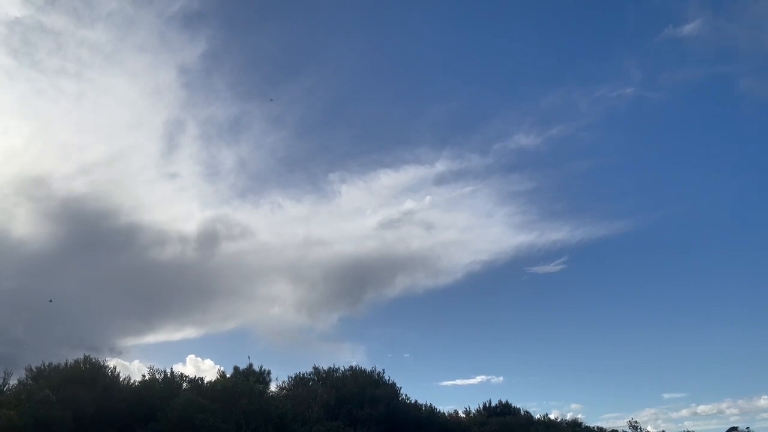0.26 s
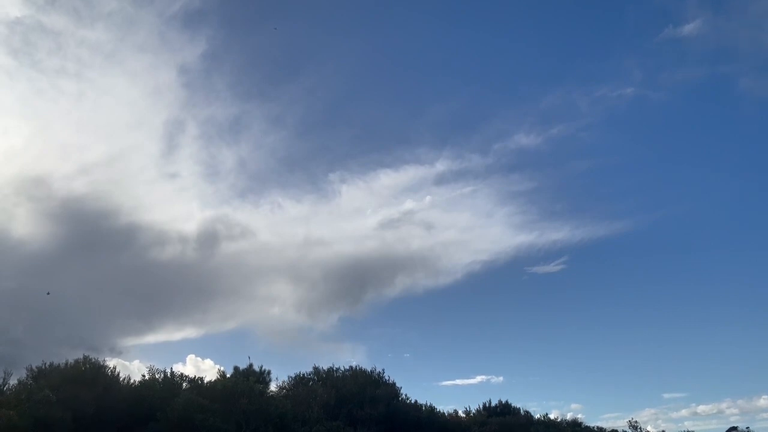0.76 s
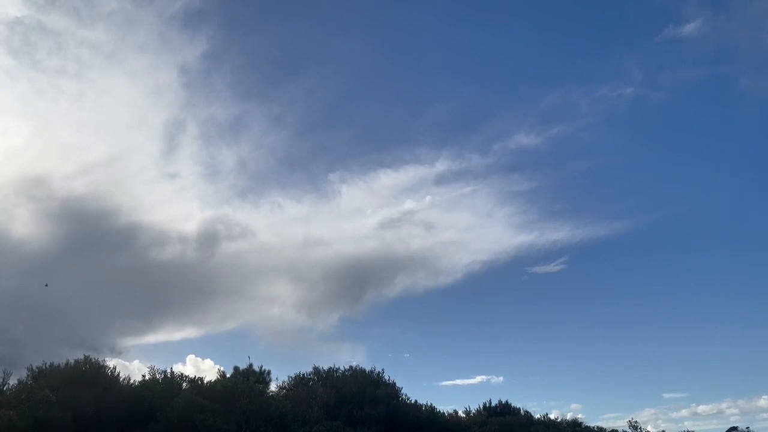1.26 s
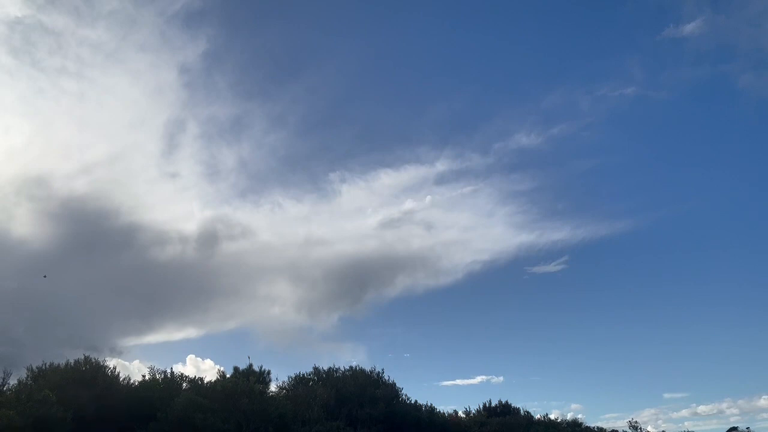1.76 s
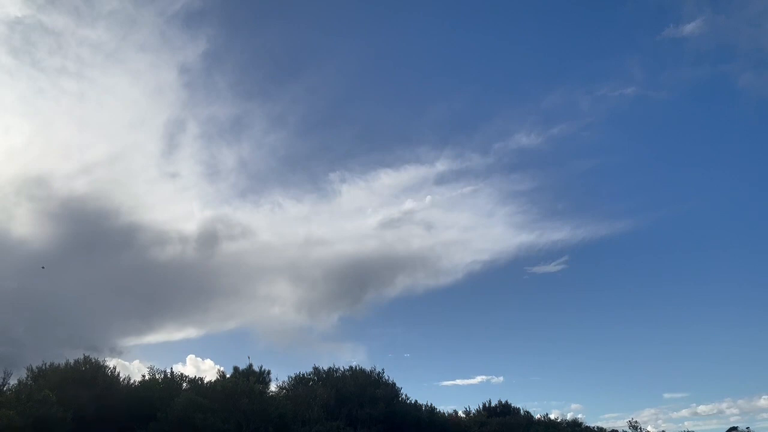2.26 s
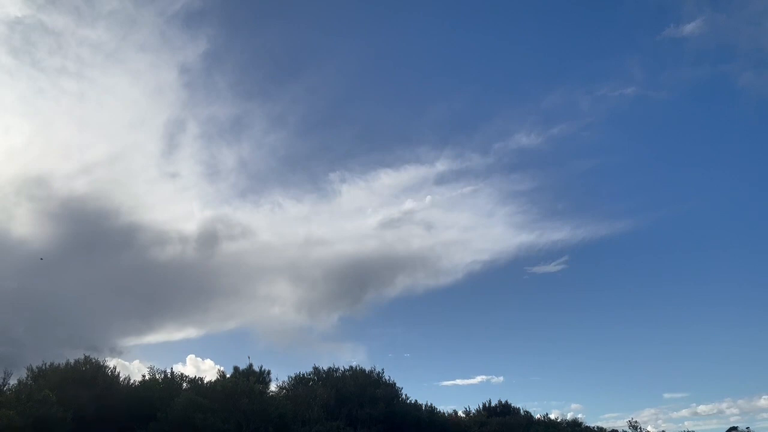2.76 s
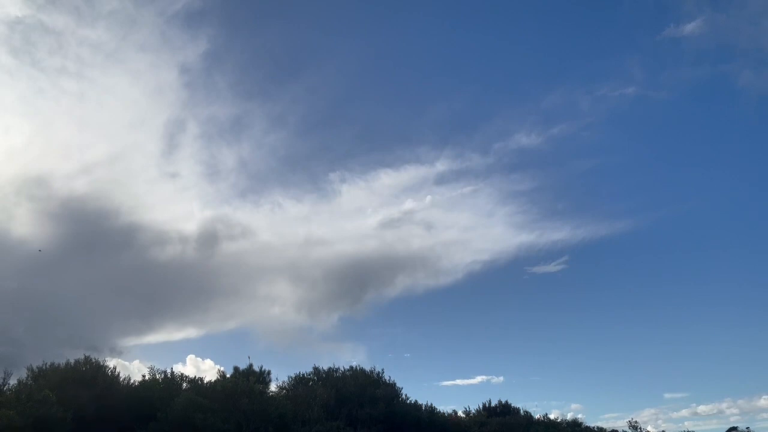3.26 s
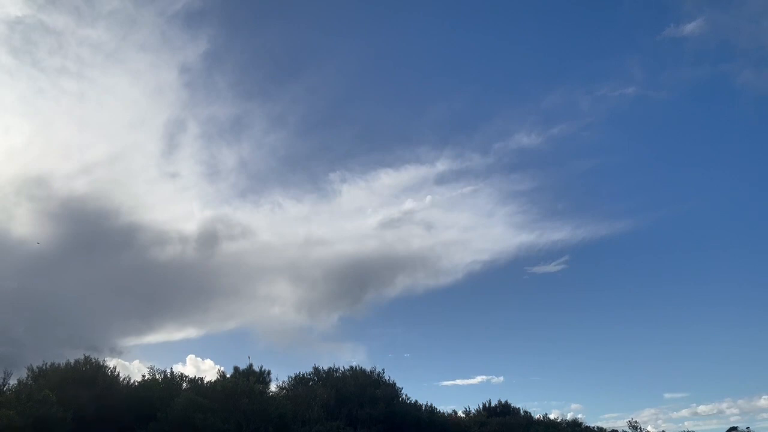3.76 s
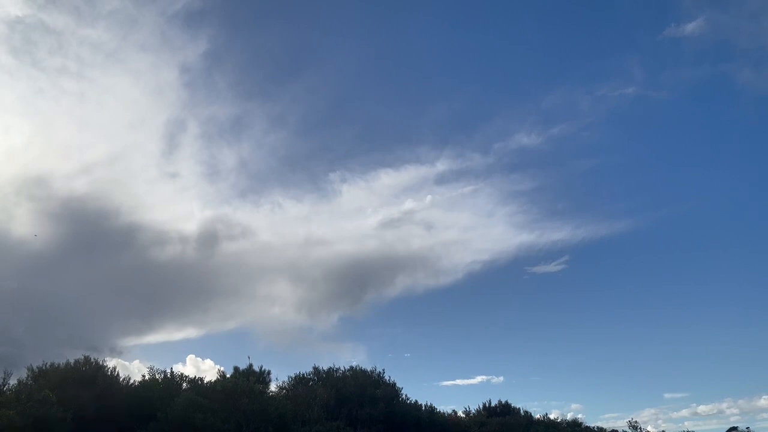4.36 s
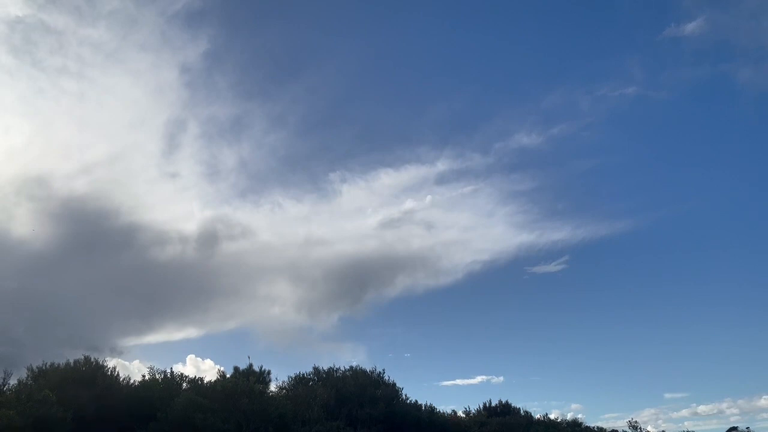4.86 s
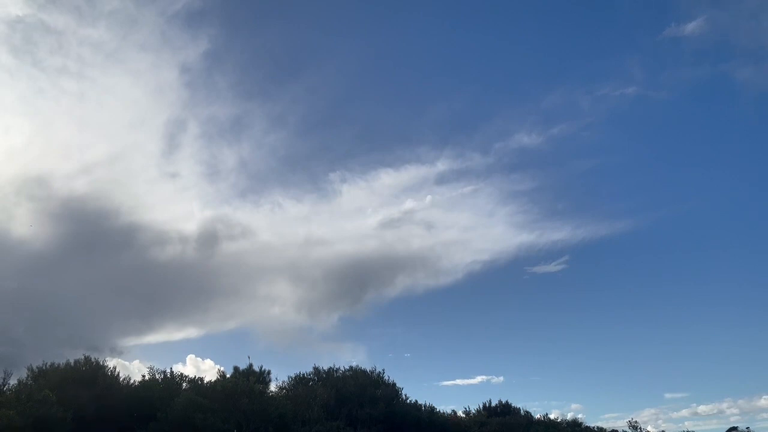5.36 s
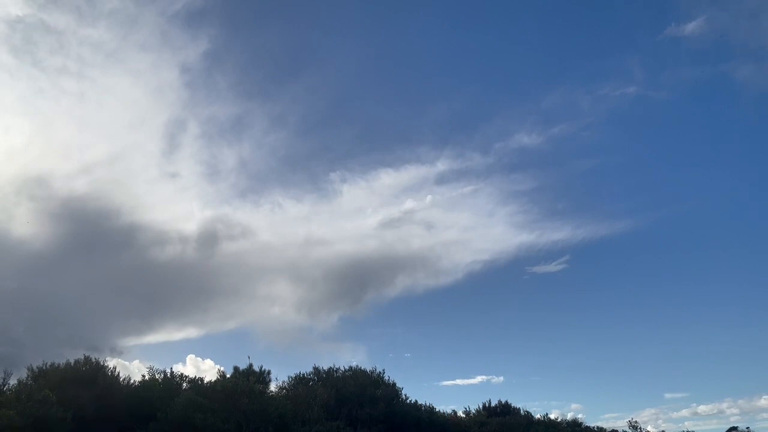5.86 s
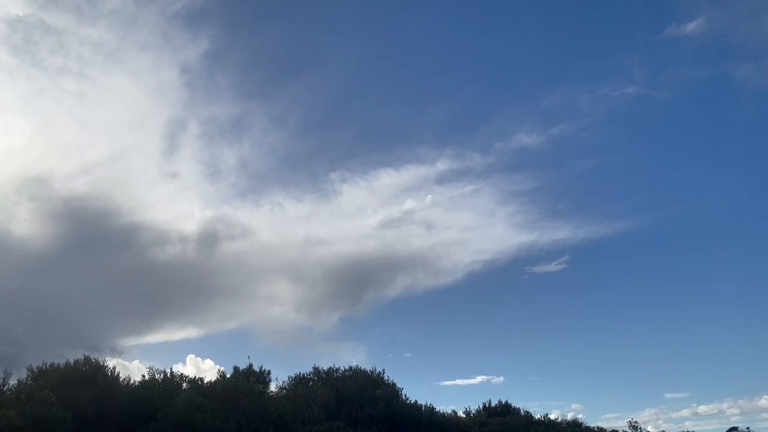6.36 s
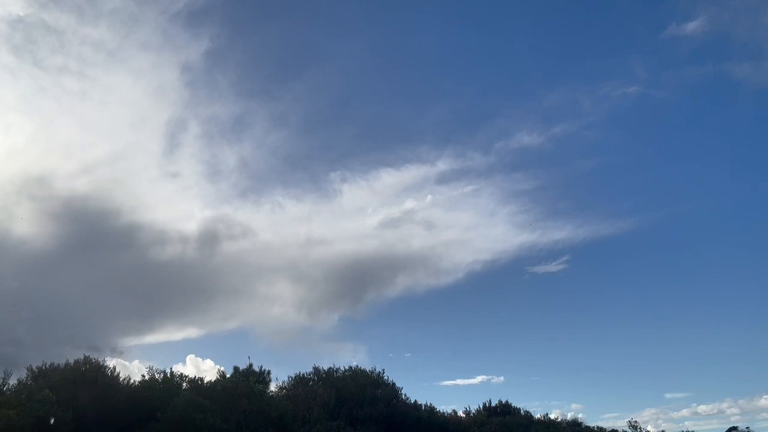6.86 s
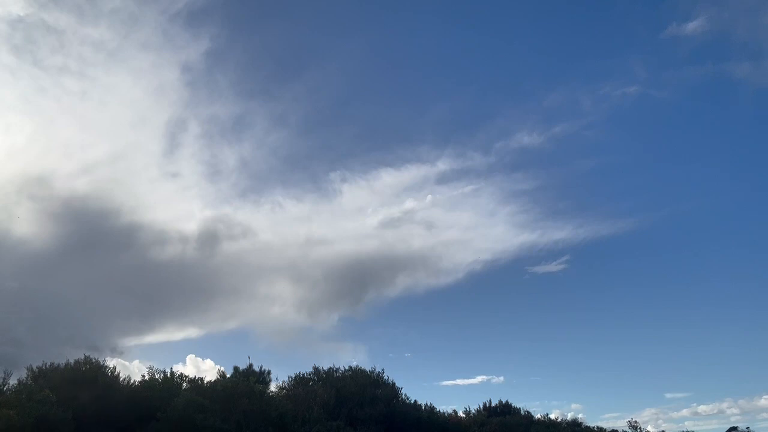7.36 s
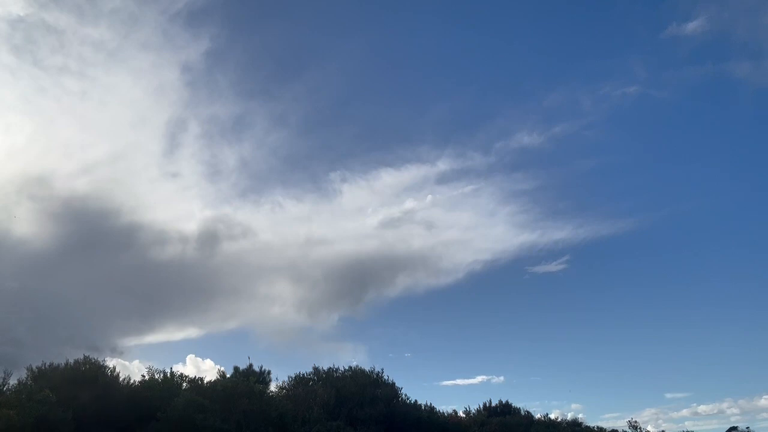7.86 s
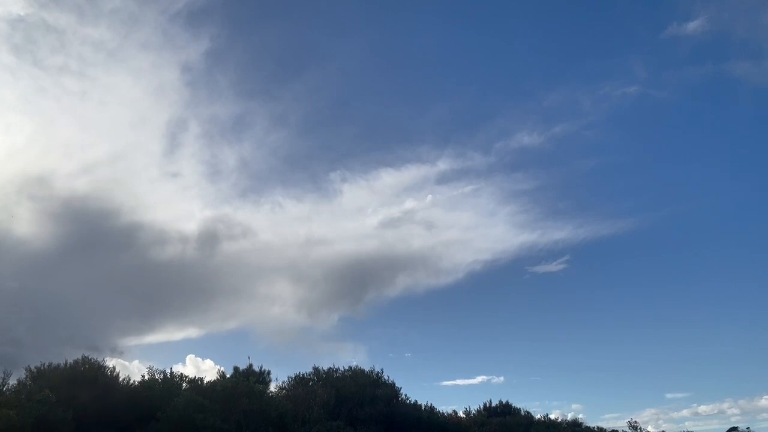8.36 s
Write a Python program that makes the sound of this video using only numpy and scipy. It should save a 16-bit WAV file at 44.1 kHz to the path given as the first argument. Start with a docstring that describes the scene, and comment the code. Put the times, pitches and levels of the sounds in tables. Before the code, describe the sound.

A jet far off under open sky, heard by a still stereo microphone near bushes. At 0 s a deep, dull exhaust rumble is already present, with a few small crackles in the first tenth of a second. It fades steadily, with faint scattered ticks until about 2.6 s, and is quietest from 3.3 to 4.4 s: only a low, distant murmur, with tiny buzzy bird chirps near 1.4 and 4.2 s, barely heard. From about 4.7 s the rumble returns, swelling unevenly. Around 6 s sharp crackles join in, popping more strongly at 6.6 and 7.3 s. Between 7.8 and 8.2 s the roar peaks, loud and tearing, with dense, steep snaps, brighter hiss and short leafy rattles. Then the roar drops quickly and dulls, leaving heavy bass rumble and a few last crackles until 8.6 s. Ground echo slightly colours the sound, and the right side is a little later and duller.

```python
"""A jet's exhaust rumbles and roars far off under open sky, fades, then swells again with crackle.
The rumble is low noise; the roar is noise and crackle dulled by the air and made to flicker by turbulence.
Steep spikes of pressure stand out as single shock fronts, and bushes rattle in answer.
The ground sends an echo, and the sound meets the left microphone port a moment before the right.
A small bird, two trilled tones, chirps barely heard."""
import sys
import numpy as np
from scipy import signal
from scipy.fft import rfft, irfft, next_fast_len
from scipy.io import wavfile
from scipy.ndimage import uniform_filter1d, minimum_filter1d, map_coordinates

SR = 44100
rng = np.random.default_rng(int(sys.argv[2]) if len(sys.argv) > 2 else 0)


def wav_out(sig):
    """Save sig, one row per channel (or a flat mono array), as 16-bit PCM at SR to the path in sys.argv[1]."""
    wavfile.write(sys.argv[1], SR, np.round(np.clip(np.atleast_2d(sig).T, -1, 1) * 32767).astype(np.int16))


N = 380132

# rumble ahead of the ports: t/s, level/dB, lift of its deepest part/dB
RUMBLE_LEVELS = [(0, -16, -9), (.45, -17, -1.5), (.9, -19.5, 5), (1.2, -21, 2.5), (1.8, -25, 7),
                 (2.05, -25.5, -2), (2.5, -25, -3), (3, -29, 0.5), (3.45, -35.5, 7.5), (4.4, -35.5, 10),
                 (4.75, -26, -4), (5.3, -27, 3.5), (5.9, -18, -8), (6.25, -13.5, -5), (6.6, -11.5, -8.5),
                 (7.15, -15, 3.5), (7.35, -10, -5), (8.1, -9.5, -3.5), (8.62, -14, -5.5)]
# rumble colour: f/Hz, relative level/dB
RUMBLE_COLOUR = [(13, -55), (22, -29), (52, -4), (76, 1), (107, -1.5), (161, -2.5), (205, -5.5),
                 (260, -15.5), (300, -27), (390, -39.5), (660, -120)]

# roar before its make-up gain: t/s, low roar level/dB, middle level/dB, treble level/dB
ROAR_LEVELS = [(0.0, -21.5, -36.5, -46), (0.1, -26, -34, -50), (0.2, -28.5, -38, -52),
               (0.46, -30.5, -39, -53), (0.77, -36, -39, -57), (1.1, -35.5, -42, -58),
               (1.44, -34, -49, -65), (1.61, -32.5, -39, -56.5), (1.73, -32.5, -48, -66),
               (1.9, -35, -47, -64.5), (2.02, -37, -45, -61), (2.23, -36.5, -48.5, -68.5),
               (2.38, -32.5, -47.5, -64), (2.46, -32, -48.5, -65.5), (2.6, -34.5, -47, -63.5),
               (2.83, -35.5, -51, -71.5), (3.27, -41.5, -54.5, -78), (3.82, -43.5, -57, -79),
               (4.61, -37.5, -48, -73.5), (4.9, -34, -44.5, -69), (5.3, -27, -43, -59.5),
               (5.6, -27, -41.5, -61), (5.91, -24.5, -42, -58.5), (6.1, -24, -41, -54),
               (6.43, -20.5, -40.5, -50), (6.65, -22, -38, -54), (7.03, -22, -37, -52),
               (7.08, -23.5, -38, -56), (7.28, -25, -35.5, -48.5), (7.44, -22.5, -36.5, -48.5),
               (7.71, -18.5, -35, -45.5), (7.78, -19, -31, -46), (7.92, -13, -29, -41),
               (8.04, -16, -25, -36.5), (8.16, -19, -34.5, -39.5), (8.31, -23.5, -34, -54),
               (8.45, -27, -39, -56), (8.62, -29, -45, -61.5)]
# roar colour when nearest: f/Hz, relative level/dB
NEAR_COLOUR = [(150, -31), (250, -4), (380, 3), (520, -2.5), (650, -5.5), (750, -10), (790, -6.5),
               (870, -6.5), (1000, -9.5), (1200, -7.5), (1600, -15), (2500, -22), (3100, -26.5),
               (3800, -29.5), (4500, -37), (5200, -39.5), (6100, -38), (7000, -40), (9000, -48.5),
               (11000, -60), (14500, -60.5)]
# balance against the low roar for which NEAR_COLOUR holds
NEAR_MIDDLE_DB, NEAR_TREBLE_DB = -7, -14.5
ROAR_MAKEUP_DB = 22.0
ROAR_WAVER_DB = 0.13  # quick unsteadiness of the whole roar
# four bands of the roar that drift on their own: t/s, then the lift/dB of each band from low to high
BAND_DRIFT = [(0, -8.5, -3.5, 1.5, -1), (.3, -4.5, 0.5, -0.5, -0.5), (0.699, 3.5, -2, 0.5, 4),
              (1.1, 2.5, -1.5, -0.5, 3), (1.449, -4, -0.5, 1, 4.5), (1.65, 1, 0, 1, -3.5),
              (1.9, -10, -0.5, 1.5, 5.5), (2.3, 2, -2.5, 1, 2), (2.6, 1.5, -3, 3, 3), (3.2, 4.5, 2.5, 0, 2),
              (3.8, 0.5, 1.5, 3, 3), (4.5, 5.5, 0.5, -2.5, -1), (4.8, 4, 3.5, -1, -2.5),
              (5.1, 6, 3, 1.5, -2), (5.4, 1.5, 0, 1.5, -1), (5.8, 2, 4, 1.5, 8.5), (6.399, 4.5, -2, 2.5, 4),
              (7.001, -3.5, -1, -1.5, -1.5), (7.45, 5.5, 1, -2.5, -3), (7.7, -8, -1, -0.5, -0.5),
              (7.95, -3.5, 6, -0.5, -9), (8.2, -5, -2.5, 2, 0.5), (8.62, 3, 4, 0.5, -1)]
BAND_HZ, BAND_WIDTH = (840, 1190, 1660, 2220), (0.11, 0.092, 0.09, 0.078)  # centres; natural-log widths
# hiss at the top of the roar, which blooms late: t/s, lift/dB
HISS_BLOOM = [(0, -1), (.3, -6), (.6, -4.5), (1.2, -5.5), (2.6, -6), (5.2, 1), (5.8, 3), (6.4, 2), (6.9, 7),
              (7.3, -4.5), (7.72, -2.5), (7.82, 13.5), (8.2, -1), (8.3, 12), (8.62, 3)]
HISS_HZ = 5500  # half of the lift in dB is reached here
# share of unrelated sound scattered to each port: f/Hz, level/dB
SCATTER_SHARE = [(150, -39.5), (400, -17.5), (800, -7.5), (1300, -12), (3000, -4), (6000, -0.5)]

# single shock fronts: start t/s, level/dB before OPEN_AIR_DB
SHOCK_FRONTS = [(0.0214, -38), (0.0368, -35), (0.0982, -32), (0.1074, -35), (0.2713, -44), (0.624, -41),
                (0.9138, -48), (1.1513, -51), (1.6014, -46), (1.9739, -48), (2.0068, -46), (2.0584, -46),
                (2.1405, -43), (2.1484, -43), (2.1705, -42), (2.3491, -49), (2.3544, -47), (2.385, -48),
                (2.5301, -51), (2.5774, -49), (2.6114, -49), (5.3552, -50), (5.4186, -51), (5.451, -45),
                (5.5079, -51), (5.5637, -51), (5.6595, -50), (5.7224, -43), (5.7503, -46), (5.8241, -49),
                (5.9558, -48), (5.9768, -36), (5.9933, -35), (6.0257, -45), (6.086, -44), (6.108, -39),
                (6.1394, -43), (6.1724, -37), (6.1898, -34), (6.204, -42), (6.2362, -42), (6.267, -43),
                (6.2756, -35), (6.2924, -39), (6.302, -40), (6.322, -38), (6.3415, -33), (6.3789, -31),
                (6.3974, -35), (6.417, -37), (6.4378, -31), (6.4867, -38), (6.5161, -41), (6.5435, -40),
                (6.5584, -44), (6.5959, -27), (6.6049, -29), (6.6408, -42), (6.7041, -41), (6.7426, -37),
                (6.76, -27), (6.8234, -41), (6.8444, -40), (6.8907, -44), (6.9266, -45), (6.996, -39),
                (7.0074, -38), (7.1511, -42), (7.1866, -38), (7.216, -34), (7.2609, -30), (7.2898, -32),
                (7.3058, -26), (7.3507, -30), (7.3624, -32), (7.4026, -33), (7.438, -30), (7.4504, -30),
                (7.4664, -32), (7.5268, -30), (7.5877, -32), (7.7189, -31), (7.7667, -29), (7.8271, -28),
                (7.8436, -26), (7.8725, -23), (7.9464, -26), (7.9503, -19), (7.956, -29), (7.9688, -16),
                (7.9748, -28), (7.982, -29), (7.9887, -19), (8.0034, -22), (8.0122, -19), (8.0381, -19),
                (8.047, -24), (8.0606, -17), (8.085, -27), (8.108, -24), (8.1294, -24), (8.1504, -26),
                (8.1758, -25), (8.1928, -27), (8.2716, -35), (8.2954, -33), (8.316, -24), (8.3464, -34),
                (8.3619, -33), (8.3983, -35), (8.4502, -45), (8.4921, -46)]
# rounding of the fronts, small = steep: t/s, rise time/ms
FRONT_ROUNDING = [(0, .08), (.6, .16), (2.6, .19), (5.4, .15), (5.97, .11), (6.1, .14), (6.5, .14),
                  (6.9, .135), (7.25, .14), (7.47, .16), (7.55, .12), (7.77, .07), (7.84, .085),
                  (7.87, .035), (7.97, .015), (7.99, .055), (8.06, .055), (8.13, .09), (8.3, .13),
                  (8.62, .15)]
OPEN_AIR_DB = 3.5  # extra strength of a front before the two ports blur it
FRONT_BODY_DB, RECOVERY_MS = -16, .35  # gain of the slow part of a front; time to recover
RING_HZ, RING_WIDTH_HZ, RING_GAIN = 4250, 1100, .9  # a front rings briefly in the treble
RATTLE_DB = -5  # the bushes' answer against the front

# as the jet crosses the sky: t/s, ground echo delay/ms, ground echo level/dB,
# lag of the right port/ms, crackle level/dB ahead of its filter
SKY_PATH = [(0, 2.15, -15, 0.19, 2), (1, 2.394, -11, 0.21, -5), (2.3, 2.347, -8.5, 0.22, 6),
            (4, 2.42, -16.5, .23, -11), (4.8, 2.335, -11.5, 0.24, -5.5), (5.5, 2.334, -7, 0.23, -1.5),
            (6.3, 2.33, -9.5, 0.24, -1), (6.9, 2.324, -8.5, .24, -8.5), (7.5, 2.49, -6, .24, 5.5),
            (8.1, 2.456, -8.5, 0.25, -3), (8.62, 2.45, -7.5, 0.25, -6.5)]
# the body shades the right port: f/Hz, weaker by/dB, phase lag/rad
RIGHT_SHADE = [(60, 1.5, 0.19), (212, 1, -0.041), (250, -0.5, .55), (397, 3.5, 0.49), (756, 6.5, 0.7),
               (1050, 6.5, -0.1), (1400, 3, -0.21), (1700, -1, -0.15), (2030, 0.5, 0.03),
               (2930, -0.5, -0.019), (4800, 1.5, 0.31), (9000, -1, 0.12)]
# surfaces close to the left, then the right port: delay/ms, gain (negative = inverted), best returned f/Hz
NEAR_SURFACES = [
    [(1.0, 0.14, 896), (3.2, 0.019, 484), (5.6, -0.068, 291.6)],
    [(.95, 0.24, 934), (2.7, 0.085, 1202), (5.0, -0.33, 830), (5.6, -0.0000095, 200)],
]

# chirps of a small bird far off: middle t/s, level/dB ahead of the bushes
BIRD_CHIRPS = [(1.42, -85), (4.19, -86)]
CHIRP_S, CHIRP_HZ, CHIRP_FALL_HZ = 0.053, 7500, 80  # swell width; middle pitch; fall per swell width
TRILL_HZ, TRILL_DEPTH_HZ, PITCH_WAVER_HZ = 100, 300, 120

MIRROR_HZ, TOP_HZ = 9600, 14900  # centre of the mirrored copies; upper band limit
EDGE_S = .002  # fade at both ends


def amp(db):
    """Decibels as an amplitude factor."""
    return 10 ** (np.asarray(db) / 20)


def unit(x):
    """x scaled to an RMS of one."""
    return x / np.sqrt(np.mean(x ** 2) + 1e-20)


def along(points, hz, column=1):
    """A column of a frequency table, read on a log axis."""
    table = np.transpose(points)
    return np.interp(np.log(hz + 1), np.log(table[0] + 1), table[column])


def curves(rows, t=None):
    """One value per sample (or per given time) for each column after the time."""
    s, *columns = np.transpose(rows)
    times = np.arange(N) / SR if t is None else t
    return [np.interp(times, s, column) for column in columns]


def wobble(rate):
    """A smooth random curve, rate knots a second."""
    knots = rng.standard_normal(int(N * rate / SR) + 4)
    return map_coordinates(knots, [np.arange(N) * rate / SR])


def filtered(x, response):
    """x times a complex response of frequency; both ends are mirrored so that they do not click."""
    edge = SR // 20
    m = next_fast_len(N + SR // 2)
    wide = np.pad(x, [(0, 0)] * (x.ndim - 1) + [(edge, edge)], mode="reflect")
    shaped = irfft(rfft(wide, m) * response(np.fft.rfftfreq(m, 1 / SR)), m)
    return shaped[..., edge:edge + N]


def delayed(x, ms):
    """x read ms late; ms may change from sample to sample."""
    return map_coordinates(x, [np.arange(N) - ms * SR / 1000], mode="nearest")


def log_bump(hz, centre_hz, width):
    """A bell of height one on a log frequency axis."""
    return np.exp(-(np.log((hz + 1) / centre_hz) / width) ** 2)


def rumble():
    """Large eddies of the exhaust: low noise whose deepest part swells on its own."""
    level_db, deep_db = curves(RUMBLE_LEVELS)
    low = unit(filtered(rng.standard_normal(N), lambda hz: amp(along(RUMBLE_COLOUR, hz))))
    deep = filtered(low, lambda hz: 1 / (1 + (hz / 62) ** 6))
    return amp(level_db) * (low - deep + amp(deep_db) * deep)


def roar():
    """Mixing noise and crackle through the air; rows: the direct sound, then what scatters to each port."""
    source = rng.standard_normal((3, N))
    source[0] += crackle()
    source *= amp(ROAR_WAVER_DB * wobble(9.1))
    hz, t, spectra = signal.stft(source, SR, nperseg=512)
    roar_db, middle_db, treble_db = curves(ROAR_LEVELS, t)
    colour_db = along(NEAR_COLOUR, hz)[:, None] + air_path(hz, t, roar_db, middle_db, treble_db)
    spectra = spectra * amp(colour_db) * turbulence(hz, spectra.shape[1:])
    spectra *= amp(roar_db + ROAR_MAKEUP_DB)
    spectra[1:] *= amp(along(SCATTER_SHARE, hz))[:, None]
    return signal.istft(spectra, SR, nperseg=512)[1][:, :N]


def crackle():
    """Uneven impulses of one sign in clumps, stripped of bass and turned a quarter cycle into steep fronts."""
    rate = 700 * amp(7.2 * wobble(40))  # impulses a second
    struck = rng.random(N) < rate / SR
    heights = amp(np.minimum(4 * rng.exponential(size=N), 15))
    impulses = struck * heights
    steps = filtered(impulses, lambda hz: 1j * (hz / 2600) ** 2 / (1 + (hz / 4000) ** 2))
    return amp(curves(SKY_PATH)[3]) * steps / np.sqrt(np.mean(impulses ** 2))


def air_path(hz, t, roar_db, middle_db, treble_db):
    """Air loss in dB grows with frequency; bending of the path moves the middle on its own."""
    slope = (np.minimum(hz, 9000) / 3300) ** 1.08
    bend = log_bump(hz, 1500, .5)
    loss_db = treble_db - roar_db - NEAR_TREBLE_DB
    bend_db = middle_db - roar_db - NEAR_MIDDLE_DB
    # the highest treble follows only the slow change of distance
    air_db = np.outer(np.maximum(slope - 1, 0), uniform_filter1d(loss_db, size=40))
    air_db += np.outer(np.minimum(slope, 1) * (1 - bend), loss_db)
    air_db += np.outer(bend, bend_db)
    for centre_hz, width, band_db in zip(BAND_HZ, BAND_WIDTH, curves(BAND_DRIFT, t)):
        air_db += np.outer(log_bump(hz, centre_hz, width), band_db)
    hiss_share = 1 - 1 / (1 + (hz / HISS_HZ) ** 4)
    return air_db + np.outer(hiss_share, curves(HISS_BLOOM, t)[0])


def turbulence(hz, shape):
    """Turbulence on the way: patches of gain in time and frequency, deeper in the treble."""
    field = uniform_filter1d(rng.standard_normal(shape), size=24, axis=0)
    field = uniform_filter1d(field, size=5, axis=1)
    return amp(1.1 * unit(field) * np.sqrt(hz / 4000)[:, None])


def ports(direct, scattered):
    """Ground echo, the lag between the ports and the surfaces close to each."""
    echo_ms, echo_db, lag_ms, _ = curves(SKY_PATH)
    # grass returns less treble
    grass = filtered(direct, lambda hz: 1 / (1 + 1j * hz / 9000))
    heard = direct + amp(echo_db) * delayed(grass, echo_ms)
    pair = np.array([heard, delayed(heard, lag_ms)]) + scattered

    def port_response(hz):
        shade = amp(-along(RIGHT_SHADE, hz)) * np.exp(-1j * along(RIGHT_SHADE, hz, column=2))
        left = near_reflections(hz, NEAR_SURFACES[0])
        right = near_reflections(hz, NEAR_SURFACES[1]) * shade
        return np.array([left, right])

    return filtered(pair, port_response)


def near_reflections(hz, surfaces):
    """The direct sound plus its copies from near surfaces, each returning a broad band."""
    response = 1
    for ms, gain, best_hz in surfaces:
        band = 1 / (1 + (1.13 * np.log((hz + 1) / best_hz)) ** 2)
        response = response + gain * np.exp(-2j * np.pi * hz * ms / 1000) * band
    return response


def shocks():
    """Each front is a sharp spike of pressure, rounded by the air, that recovers within a millisecond."""
    out = np.zeros(N + SR)
    ms = np.arange(-128, 128) / SR * 1000
    # the edge of a front stands out most; its slow part is weaker
    slow = 1 / (1 + (np.fft.rfftfreq(len(ms), 1 / SR) / 3000) ** 6)
    for s, db in SHOCK_FRONTS:
        rise_ms = curves(FRONT_ROUNDING, s)[0]
        spike = rfft(-np.log(ms ** 2 + rise_ms ** 2) * np.exp(-(ms / RECOVERY_MS) ** 2))
        edge, body = irfft((1 - slow) * spike), irfft(slow * spike)
        front = (edge + amp(FRONT_BODY_DB) * body) / np.abs(edge).max()
        # the spike peaks 56 samples after its start time
        out[round(s * SR) - 72:][:len(ms)] += amp(db + OPEN_AIR_DB) * front

    def ringing(hz):
        damping = 1j * hz * RING_WIDTH_HZ
        return 1 + RING_GAIN * damping / (RING_HZ ** 2 - hz ** 2 + damping)

    return filtered(out[:N], ringing)


def bushes(x):
    """Leaves and uneven ground answer with a short rattle of decaying noise, different at each port."""
    t = np.arange(SR // 40) / SR
    decay = amp(-60 * t / 0.051) * (t > .0004)
    tail = rng.standard_normal((2, len(t))) * decay
    return signal.fftconvolve(x[None], tail / np.linalg.norm(tail[0]), axes=1)[:, :N]


def bird():
    """Thin buzzy chirps that trill fast and fall a little, blurred by the bushes."""
    t, out = np.arange(N) / SR, np.zeros(N)
    trill = TRILL_DEPTH_HZ * np.sin(2 * np.pi * TRILL_HZ * t)
    for s, db in BIRD_CHIRPS:
        u = np.clip((t - s) / CHIRP_S, -4, 4)  # time in swell widths
        hz = CHIRP_HZ - CHIRP_FALL_HZ * u + trill + PITCH_WAVER_HZ * wobble(150)
        out += amp(db) * np.exp(-u ** 2) * np.sin(2 * np.pi * np.cumsum(hz) / SR)
    return bushes(out)


def scene():
    """The jet at both ports, and the bird."""
    direct, *scattered = roar()
    fronts = shocks()
    jet = rumble() + direct + fronts
    rattle = amp(RATTLE_DB) * bushes(fronts)
    return ports(jet, np.array(scattered) + rattle) + bird()


def record(dry):
    """A limiter turns down the loudest peaks; faint mirrored copies, self-noise and band limits follow."""
    needed = np.minimum(1, 0.9 / (np.abs(dry).max(axis=0) + 1e-9))
    sound = dry * uniform_filter1d(minimum_filter1d(needed, size=1200), size=600)
    # very faint copies of the sound lie mirrored on both sides of one high frequency
    mirrored = amp(-63.0) * sound * np.cos(2 * np.pi * MIRROR_HZ * np.arange(N) / SR)
    noise = rng.standard_normal(dry.shape)
    self_noise = amp(-100) * filtered(noise, lambda hz: 0.8 + 0.7 / (1 + (hz / 9500) ** 8))
    samples_to_end = np.minimum(np.arange(N), np.arange(N)[::-1])
    fade = np.clip(samples_to_end / (EDGE_S * SR), 0, 1)

    def microphone(hz):
        bass_cut = 1 - 1 / (1 + (hz / 36) ** 4)
        return bass_cut / (1 + (hz / TOP_HZ) ** 60)

    return fade * filtered(sound + mirrored + self_noise, microphone)


dry = scene()
out = record(dry)
wav_out(out)
```